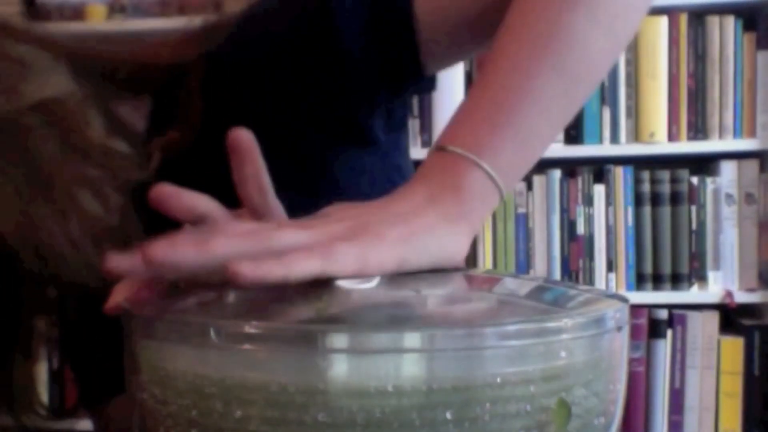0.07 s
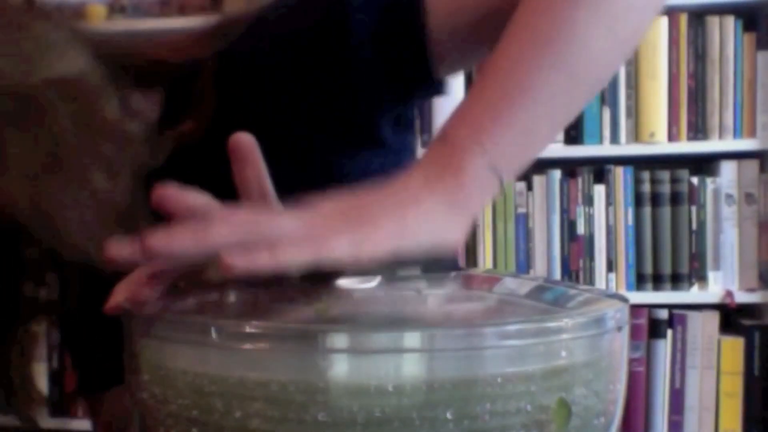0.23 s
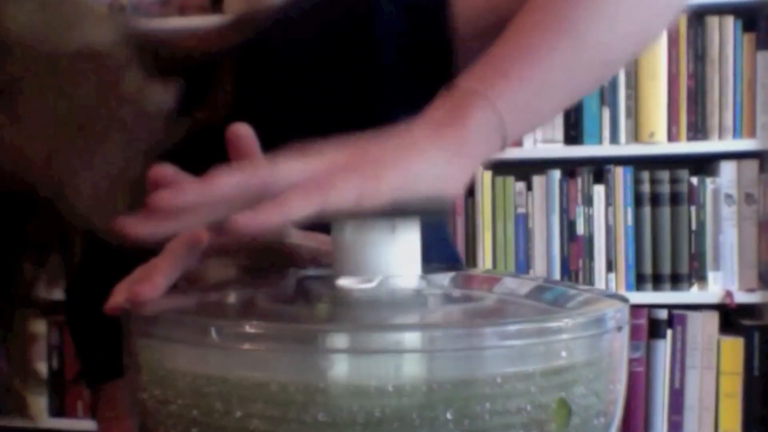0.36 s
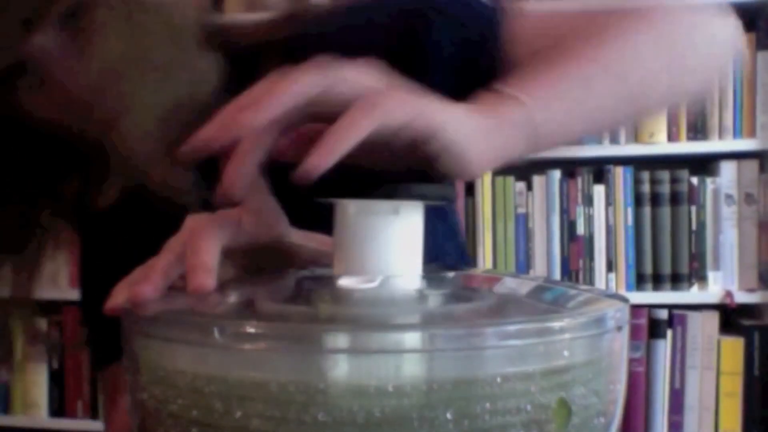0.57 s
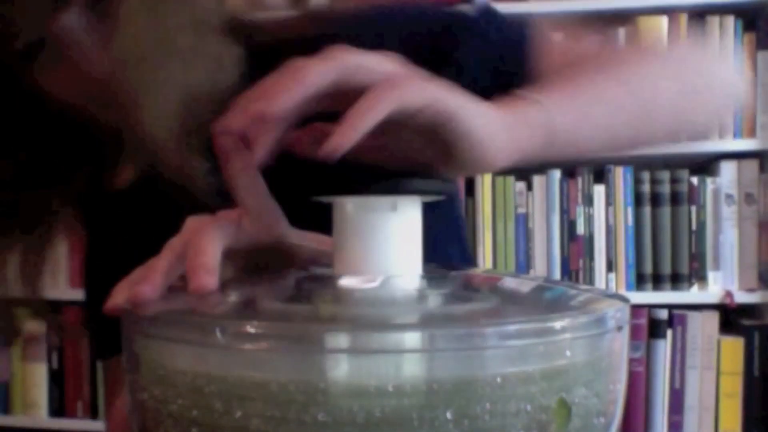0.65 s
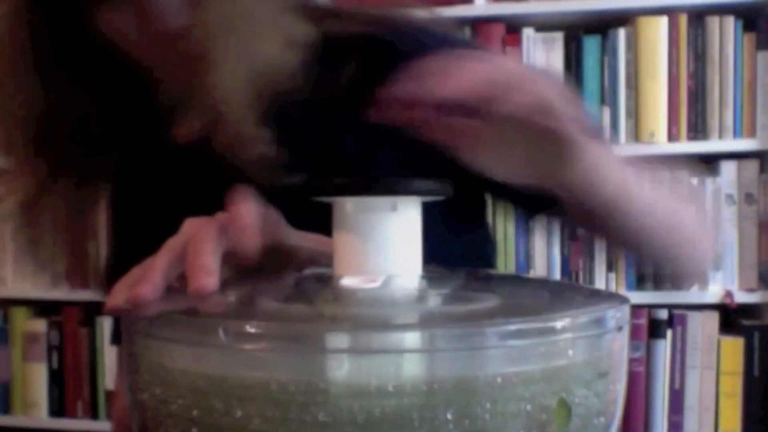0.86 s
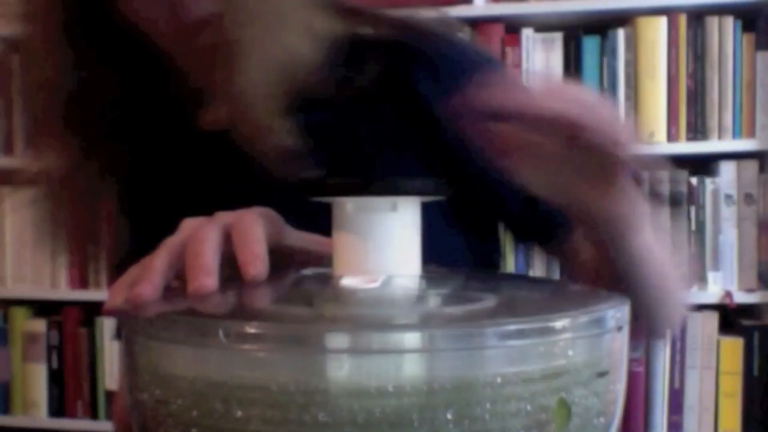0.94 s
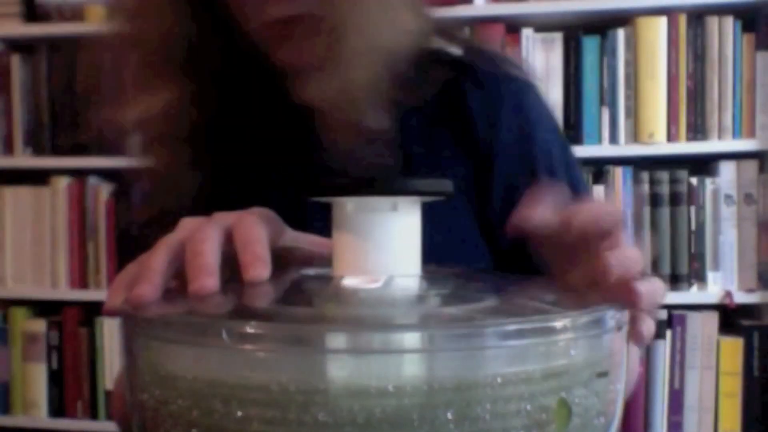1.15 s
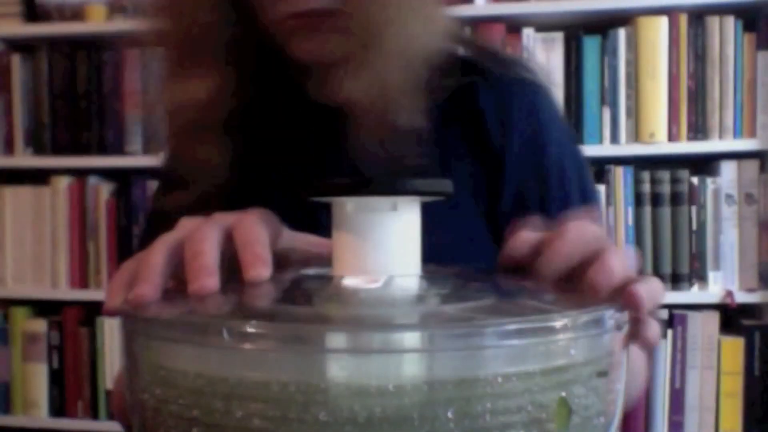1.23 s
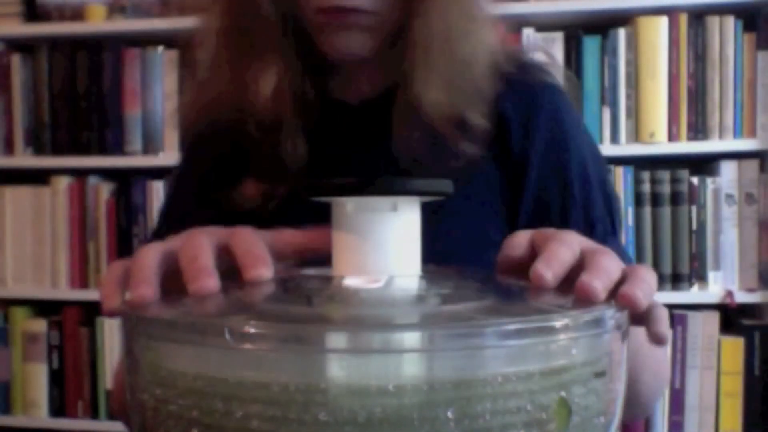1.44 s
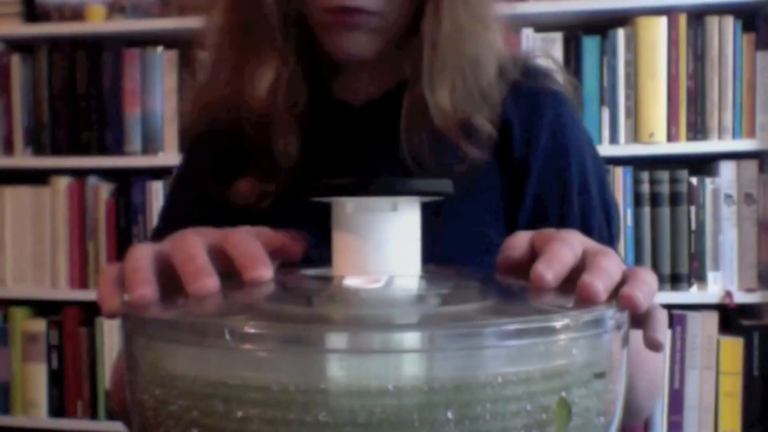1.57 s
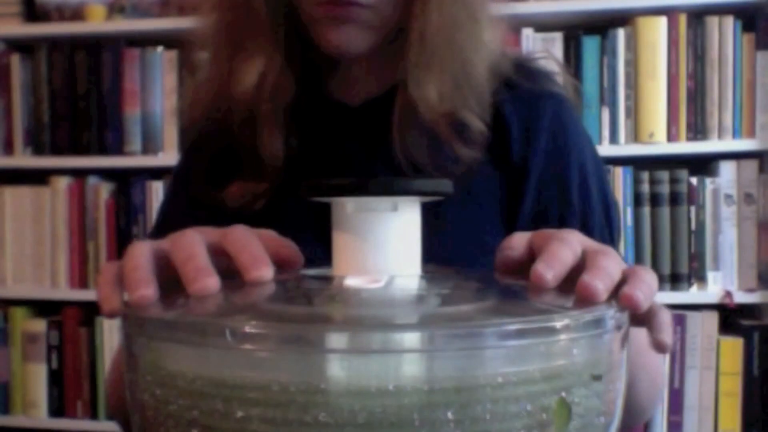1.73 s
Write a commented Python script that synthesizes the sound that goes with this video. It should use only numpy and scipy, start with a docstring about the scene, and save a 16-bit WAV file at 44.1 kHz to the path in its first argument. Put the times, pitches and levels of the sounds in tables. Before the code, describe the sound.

A plastic salad spinner coasts with a low, rubbing whirr. Its spring plunger rattles upward, clicks and knocks against its stop, then the whirr fades with faint hollow ticks, heard close in a small room.

```python
"""A low whirr: a plastic salad spinner coasts on a table in a small room, its basket rubbing once a turn.
The hand lets the pump go: the plunger rattles up on its spring, its shaft rasping in the lid,
then clicks free of the catch and knocks against its stop.
Only the basket's whirr is left, with faint hollow tocks and ticks."""
import sys
import numpy as np
from scipy import signal
from scipy.fft import rfft, irfft, next_fast_len
from scipy.io import wavfile
from scipy.ndimage import map_coordinates

SR = 44100
rng = np.random.default_rng(int(sys.argv[2]) if len(sys.argv) > 2 else 0)


def file_out(sig):
    """Save sig as 16-bit WAV at sys.argv[1]."""
    # one column per channel
    cols = np.atleast_2d(sig).T
    # limit, then scale
    lim = np.clip(cols, -1, 1)
    pcm = np.round(lim * 32767).astype(np.int16)
    wavfile.write(sys.argv[1], SR, pcm)


N = 79380
TIME_S = np.arange(N) / SR
HIT_S = np.arange(4096) / SR  # time within one hit


def amp(db):
    """Decibels to gain."""
    return 10 ** (np.asarray(db) / 20)


def unit(x):
    """Scale to rms 1."""
    return x / np.sqrt(np.mean(x ** 2) + 1e-20)


def unit_hit(x):
    """Scale to the energy of 10 ms at rms 1."""
    return x / np.sqrt(np.sum(x ** 2) / (SR / 100) + 1e-20)


def along(points, hz):
    """Interpolate (Hz, value) points on a log frequency axis."""
    point_hz, values = np.transpose(points)
    return np.interp(np.log(hz + 1), np.log(point_hz + 1), values)


def level(points):
    """Gain per sample from (s, dB) points."""
    return amp(np.interp(TIME_S, *np.transpose(points)))


def flicker(depth_db, rate_hz):
    """Smooth random gain."""
    knots = rng.standard_normal(N // 10)
    return amp(depth_db * map_coordinates(knots, [TIME_S * rate_hz]))


def colour(x, db_of_hz):
    """Minimum-phase filter with the given gain curve."""
    size = 2 * next_fast_len(len(x))
    cepstrum = irfft(np.log(amp(db_of_hz(np.fft.rfftfreq(size, 1 / SR)))), size)
    cepstrum[1:size // 2] *= 2
    cepstrum[size // 2 + 1:] = 0
    return irfft(rfft(x, size) * np.exp(rfft(cepstrum)), size)[:len(x)]


def noise(spectrum):
    """Noise of rms 1 shaped by (Hz, dB) points."""
    size = next_fast_len(N)
    gain = amp(along(spectrum, np.fft.rfftfreq(size, 1 / SR)))
    return unit(irfft(rfft(rng.standard_normal(size)) * gain, size)[:N])


def fade(t60_s, attack_s, t=HIT_S):
    """Quick rise, exponential decay."""
    return np.exp(-np.log(1000) * t / t60_s) * (1 - np.exp(-t / attack_s))


def burst(db_of_hz, t60_s, attack_s):
    """Decaying coloured noise of one contact."""
    return unit_hit(colour(rng.standard_normal(len(HIT_S)) * fade(t60_s, attack_s), db_of_hz))


def ring(modes, attack_s, pitch=1):
    """Damped modes, slightly different at each contact."""
    out = 0
    for k, (hz, db, t60_s) in enumerate(modes):
        gain = (-1) ** k * amp(db + rng.normal(0, 1.14))
        detuned_hz = hz * pitch * (1 + rng.normal(0, 0.012))
        out += gain * np.sin(2 * np.pi * detuned_hz * HIT_S) * fade(t60_s, attack_s)
    return unit_hit(out)


def add(track, start_s, sound):
    """Mix a sound in at start_s."""
    part = track[max(round(start_s * SR), 0):][:len(sound)]
    part += sound[:len(part)]


def contacts(rows, modes, crack, crack_db, crack_t60_s, attack_s):
    """Each contact rings the part's modes over a crack of noise, with its own spectral tilt."""
    out = np.zeros(N)
    for start_s, db, db_per_octave, *pitch in rows:
        snap = burst(lambda hz: along(crack, hz), crack_t60_s, attack_s)
        hit = ring(modes, attack_s, *pitch) + amp(crack_db) * snap
        tilted = colour(hit, lambda hz: db_per_octave * np.log2(np.clip(hz, 150, 6000)))
        add(out, start_s, amp(db) * unit_hit(tilted))
    return out


def hiss():
    """Microphone hiss with two faint whines."""
    # Each row: frequency in Hz, level in dB.
    spectrum = [(30, 2), (1500, 3), (3000, 5), (4150, -6.5), (4400, 5.5), (4750, 2.5), (5500, -25),
                (6450, -14), (6850, 4.5), (6980, 2.5), (7200, -11), (7500, -6), (8400, -5), (9100, -10.5),
                (10000, -14), (15500, -19)]
    return amp(-65.5) * noise(spectrum)


def room(x):
    """Reverb of a small furnished room: a short tail, shortest in the bass and top treble."""
    # Each row: frequency in Hz, t60 in seconds.
    decay = [(120, 0.07), (500, 0.18), (2500, 0.2), (6000, 0.17), (14000, 0.05)]
    hz, t, bins = signal.stft(rng.standard_normal(SR // 2), SR, nperseg=256)
    bins = bins * np.exp(-np.log(1000) * t / along(decay, hz)[:, None])
    tail = signal.istft(bins, SR, nperseg=256)[1]
    tail = np.pad(tail, (round(0.005 * SR), 0))
    return amp(-15) * signal.fftconvolve(x, tail / np.linalg.norm(tail))[:N]


def basket():
    """The coasting basket whirrs and rubs as it comes round."""
    # Rub peaks and whirr envelope. Each row: time in seconds, level in dB.
    rubs = [(0.018, -42.5), (.235, -44.5), (0.322, -38), (.425, -44), (0.618, -32), (0.732, -33.5),
            (0.84, -40), (0.952, -51), (1.049, -39.5), (1.165, -42), (1.263, -42), (1.38, -44),
            (1.475, -48), (1.596, -44), (1.699, -46)]
    whirr_envelope = [(0, -41.5), (.085, -48.5), (.11, -49.5), (.17, -48), (.3, -41.5), (.53, -42.5),
                      (.75, -43.5), (.9, -46.5), (1.1, -47.5), (1.3, -47), (1.42, -52), (1.48, -53),
                      (1.55, -52), (1.8, -53)]
    # Each row: frequency in Hz, level in dB.
    rub_spectrum = [(60, -31), (130, 2.5), (280, 3.5), (550, -2), (820, 0.5), (1050, -4.5), (1400, -10.5),
                    (2400, -11.5), (3500, -19), (5500, -35), (8000, -45), (15000, -60)]
    whirr_spectrum = [(40, -23), (80, -20), (120, 6.5), (270, 4), (420, -1.5), (560, -5), (850, 1.5),
                      (1100, -9.5), (1450, -10.5), (2200, -8.5), (2900, -16), (3800, -18.5), (5200, -24.5),
                      (6200, -28), (15000, -53)]
    rub_width_s = 0.016
    swells = sum(amp(db) * np.exp(-0.5 * ((TIME_S - peak_s) / rub_width_s) ** 2) for peak_s, db in rubs)
    rub = unit(noise(rub_spectrum) * flicker(depth_db=2.0, rate_hz=260))
    whirr = unit(noise(whirr_spectrum) * flicker(depth_db=2.37, rate_hz=69.56))
    return swells * rub + level(whirr_envelope) * whirr


def basket_tocks():
    """The basket knocks inside the bowl: a hollow ring over the contact's scrape."""
    # Each row: start in seconds, pitch in Hz, level in dB, overtone in relative dB.
    tocks = [(0.1407, 783, -38, -32), (.1415, 970, -44, -25), (0.194, 1397, -41, -40),
             (0.7992, 793, -24, -11), (1.158, 1005, -39, -12.5), (1.175, 832, -36, -8),
             (1.26, 1023, -38, -33), (1.362, 864, -46, -15), (1.584, 1022, -38, -32),
             (1.692, 706, -58, -31), (1.724, 442, -41.5, -19)]
    overtone_ratio, t60_s, scrape_db = 2.43, 0.028, -15
    out = np.zeros(N)
    for start_s, hz, db, overtone_db in tocks:
        scrape = burst(lambda f: -5 * np.log2((f + 100) / hz) ** 2, t60_s, attack_s=0.0011)
        tone = ring([(hz, 0, t60_s), (hz * overtone_ratio, overtone_db, t60_s)], attack_s=0.0085)
        add(out, start_s, amp(db) * (tone + amp(scrape_db) * scrape))
    return out


def bowl_thuds():
    """The bowl bumps dully on the table."""
    # Each row: start in seconds, level in dB, tilt in dB per octave, pitch ratio.
    thuds = [(.052, -33, -1, 1.02), (.064, -38, -8, 0.66), (.128, -42.5, 0, 1.09), (.137, -37.5, 1, 0.78),
             (.3235, -24.5, 0.5, 1.23), (.3315, -21.5, 0.5, 1.03), (.339, -22, 1, 1.214),
             (.343, -32, 2, 1.36), (.5935, -27, -6, 0.88), (.606, -27.5, 4.5, 1.08), (.6228, -36, -3, 0.78),
             (.709, -31, 1, 1.8), (.7275, -37.5, 2.5, 0.38), (.7415, -32.5, 2, 1.27),
             (.756, -39.5, 1, 0.97), (.928, -37, 2, 1.13), (.945, -41.5, 3, 0.96), (.962, -37, 1.5, 1.33),
             (1.018, -44, 2.5, 1.33), (1.05, -47, -2, 0.91), (1.18, -41, 1.5, 0.87), (1.4395, -44, 2, 1.2),
             (1.484, -38, -2.5, 0.73), (1.615, -42, -15, 0.71), (1.688, -47.5, -1, 1.7),
             (1.728, -42.5, 1, 0.756)]
    # Each row: frequency in Hz, level in dB and, for modes, t60 in seconds.
    modes = [(163, 0.5, 0.075), (255.5, 1, 0.053), (321, 3, 0.011), (437, -4, 0.011)]
    crack = [(60, -35.5), (110, -15), (170, 5.5), (330, 0), (550, -7), (900, -2.5), (1500, -23),
             (2400, -17.5), (4000, -30), (7000, -42), (15000, -67)]
    return contacts(thuds, modes, crack, crack_db=-3.0, crack_t60_s=0.034, attack_s=0.0045)


def plastic_ticks():
    """Light, sharp contacts on the bowl and lid."""
    # Each row: start in seconds, level in dB, tilt in dB per octave, pitch ratio.
    ticks = [(.1855, -45, 0, 1.2), (.3402, -41, 3, 0.9), (.655, -48, 22, 0.78), (.7545, -43, 6, 0.78),
             (.8302, -43, 3, 0.78), (.8425, -52.5, 7, 1.09), (.9605, -48.5, 3, 0.83),
             (1.0345, -47, 2.5, 0.57), (1.0395, -42, 7.5, 0.69), (1.0445, -59, 1, 0.7),
             (1.053, -41, 3, 0.7), (1.1755, -50.5, 8, 0.9), (1.2457, -56, 3.5, 1.27),
             (1.4398, -32.5, -1, 1.01)]
    # Each row: frequency in Hz, level in dB and, for modes, t60 in seconds.
    modes = [(1150, 7.5, 0.03), (1940, -6, 0.014), (3137, 4.5, 0.019), (4990, -5.5, 0.019),
             (5860, -10.5, 0.02), (8400, -24, 0.0086)]
    crack = [(150, -16.5), (700, 13), (1150, 21), (1900, 10), (3000, 9.5), (6000, -29), (9000, -46),
             (15000, -54)]
    return contacts(ticks, modes, crack, crack_db=-5.5, crack_t60_s=0.022, attack_s=0.0001)


def lid_scuffs():
    """Plastic and fingertips scuff drily on the lid."""
    # Each row: start in seconds, level in dB, tilt above 2 kHz in dB per octave.
    scuffs = [(0.3290, -50.5, -4.5), (0.843, -49.5, -3), (1.035, -55, -8), (1.0477, -42.5, 1.5),
              (1.051, -47, -4)]
    # Each row: frequency in Hz, level in dB.
    spectrum = [(200, 5), (900, -13), (2600, 6), (4500, -5.5), (7200, 2.5), (8400, -15), (10400, -13.5),
                (11700, -28), (15000, -12)]
    out = np.zeros(N)
    for start_s, db, db_per_octave in scuffs:
        scuff = burst(lambda hz: along(spectrum, hz) + db_per_octave * np.log2(np.maximum(hz, 2000)),
                      t60_s=0.0063, attack_s=0.00022)
        add(out, start_s, amp(db) * scuff)
    return out


def spring():
    """Tiny slips ring the stretching spring; its coils twang against each other."""
    # Each row: time in seconds, level in dB.
    scrape_envelope = [(.245, -61), (.285, -45.5), (.37, -47), (.43, -39), (.47, -45), (.53, -48),
                       (.57, -62), (.66, -76)]
    # Each row: frequency in Hz, level in dB, t60 in seconds.
    coil_modes = [(2260, 0, 0.019), (2500, 1, 0.0085), (2636, -4, 0.027), (4260, -10, .01)]
    # Each row: start in seconds, pitch in Hz, level in dB.
    twangs = [(0.284, 2350, -41), (.292, 2390, -39), (0.2974, 2500, -39.5), (0.3107, 2480, -39),
              (0.36, 2510, -36), (0.4005, 2420, -28.5), (0.4674, 2430, -39), (0.494, 2520, -30),
              (0.4997, 2370, -32.5), (0.5171, 2520, -46), (1.0392, 2380, -41), (1.047, 2600, -39.5)]
    slips_per_s = 900
    slips = (rng.random(N) < slips_per_s / SR) * rng.standard_normal(N)
    slips *= flicker(depth_db=5.5, rate_hz=90)
    scrape = signal.fftconvolve(slips, ring(coil_modes, attack_s=0.0032))[:N]
    out = level(scrape_envelope) * unit(scrape)
    for start_s, hz, db in twangs:
        add(out, start_s, amp(db) * ring([(hz, 0, 0.011)], attack_s=0.0017))
    return out


def shaft():
    """The shaft slides in the lid: a gritty rasp, a thin scrape where it is fastest, brief squeaks."""
    # Each row: time in seconds, level in dB.
    rasp_envelope = [(.2, -71), (.255, -37.5), (.30, -69), (.335, -41), (.37, -52), (.408, -53), (.43, -50),
                     (.52, -52), (.565, -51.5), (.585, -30.5), (.605, -32), (.635, -42), (.662, -32.5),
                     (.685, -30), (.73, -45), (.78, -65), (.88, -85)]
    # Each row: frequency in Hz, level in dB.
    rasp_spectrum = [(100, -4.5), (400, 6.5), (900, 10), (1500, 6), (2500, 3.5), (3300, 2), (4300, -6.5),
                     (6000, -12.5), (7500, -24.5), (11000, -26), (15500, -35)]
    scrape_spectrum = [(1000, -34), (3300, -15), (3950, 20), (4500, 16), (5300, -3), (6200, -21),
                       (9000, -35), (16000, -53)]
    # Each row: start in seconds, pitch in Hz, level in dB.
    squeaks = [(0.4432, 8000, -54.5), (0.456, 11640, -61)]
    grains = rng.standard_normal(N) * flicker(depth_db=3, rate_hz=700)
    out = level(rasp_envelope) * unit(colour(grains, lambda hz: along(rasp_spectrum, hz)))
    scrape_start_s, scrape_db = 0.439, -37
    swell = fade(t60_s=0.24, attack_s=0.0018, t=np.maximum(TIME_S - scrape_start_s, 0))
    out += amp(scrape_db) * swell * noise(scrape_spectrum)
    for start_s, hz, db in squeaks:
        add(out, start_s, amp(db) * ring([(hz, 0, 0.015)], attack_s=0.0007))
    return out


def plunger_rattle():
    """The rising plunger chatters in its sleeve."""
    # Each row: start in seconds, level in dB, tilt in dB per octave.
    rattles = [(.2372, -44, -1), (.2416, -28.5, 3), (.2462, -38, 0), (.2595, -40, 13), (.3195, -32, -2),
               (.3235, -39.5, 4), (.3295, -33.5, 5.5), (.3962, -31.5, -4), (.4012, -30, -2),
               (.4058, -25.5, 0), (.4102, -30.5, -3), (.4388, -30, -2), (.4428, -28.5, 6.5),
               (.4492, -25, 4), (.4545, -46, -4), (.4905, -30.5, -6.5), (.4945, -33, 10.5),
               (.5520, -55, 19), (.6055, -45, -10), (.6105, -31, 5)]
    # Each row: frequency in Hz, level in dB and, for modes, t60 in seconds.
    modes = [(429, -18, 0.14), (771, 3.5, 0.053), (1410, -1.5, 0.02), (2088, 4, 0.024), (2316, 5, 0.02),
             (2680, -1, 0.018), (2870, -26, 0.015), (3840, -31, 0.0048), (5030, -14, 0.013)]
    crack = [(80, -48), (300, 6), (800, 1.5), (1600, -1), (2500, 6.5), (3500, -6.5), (5500, -17),
             (7000, -43.5), (15000, -58)]
    return contacts(rattles, modes, crack, crack_db=-4.5, crack_t60_s=0.013, attack_s=0.00017)


def catch_click():
    """The catch lets the plunger go."""
    # Each row: start in seconds, level in dB, tilt in dB per octave.
    clicks = [(.5732, -19.5, 2.5), (.5745, -17, -0.5), (.577, -29, -5)]
    # Each row: frequency in Hz, level in dB and, for modes, t60 in seconds.
    modes = [(710, -6, 0.015), (996, 3, 0.048), (1420, -8.5, 0.013), (1752, 4, 0.02), (2100, 1, 0.026),
             (2590, 2.5, 0.023), (2694, 5, 0.032), (3270, -5, 0.024), (4100, -16, 0.018),
             (4730, -14.5, 0.022), (5830, -7, 0.022), (8950, -21, 0.0099)]
    crack = [(100, -2), (350, -0.5), (750, 9), (1700, 1), (2800, 1), (4000, 2), (6000, -16), (7500, -29.5),
             (13000, -18.5), (16000, -57)]
    return contacts(clicks, modes, crack, crack_db=-11, crack_t60_s=0.017, attack_s=0.00054)


def stop_knock():
    """The plunger hits its stop and shakes the lid."""
    # Each row: start in seconds, level in dB, tilt in dB per octave.
    blows = [(.6688, -20.5, -3), (.6722, -18, 1), (.6742, -17, -1.5), (.6785, -22.5, -1.5),
             (.686, -35, 2.5), (.6945, -29, -2)]
    # Each row: frequency in Hz, level in dB and, for modes, t60 in seconds.
    modes = [(129.3, -5, 0.15), (255, 6.5, 0.074), (422, 1, 0.042), (588, 3, 0.048), (735, -7, 0.047),
             (993, -1, 0.13), (1240, 3.5, 0.044), (1690, -11, 0.03), (2077, 5.5, 0.05), (2292, 5.5, 0.084),
             (2515, 5.5, 0.048), (2750, 0, 0.051), (4100, -21, 0.09)]
    crack = [(50, -62), (130, 0.5), (250, 6), (700, 2.5), (1500, -10), (2500, -1.5), (4000, -14.5),
             (6000, -21), (7000, -26.5), (10000, -32.5), (15000, -48)]
    return contacts(blows, modes, crack, crack_db=3.0, crack_t60_s=0.012, attack_s=0.0011)


def scene():
    """Spinner, room and hiss, in mono."""
    pump = plunger_rattle() + catch_click() + stop_knock() + shaft() + spring()
    bowl = bowl_thuds() + plastic_ticks() + lid_scuffs()
    spinner = pump + bowl + basket() + basket_tocks()
    return (spinner + room(spinner) + hiss())[None]


def record(dry):
    """The microphone loses the deep bass and everything above its band limit."""
    low_hz, top_hz = 88, 15800
    thin = signal.sosfilt(signal.butter(4, low_hz, "high", fs=SR, output="sos"), dry)
    size = next_fast_len(N + SR // 2)
    in_band = np.fft.rfftfreq(size, 1 / SR) < top_hz
    return irfft(rfft(thin, size) * in_band, size)[..., :N]


dry = scene()
out = record(dry)
file_out(out)
```